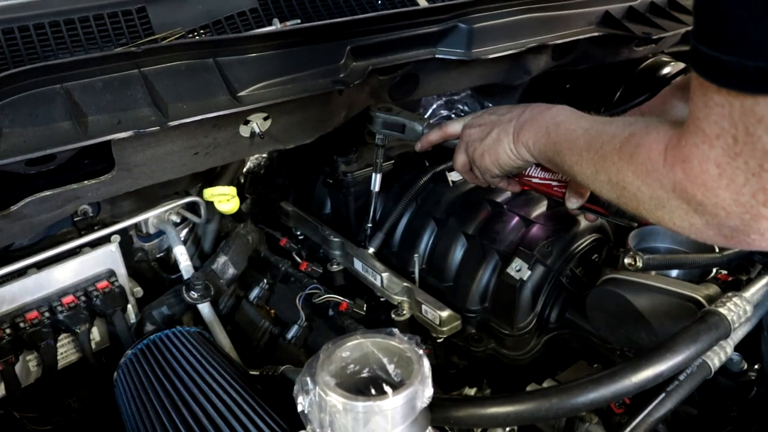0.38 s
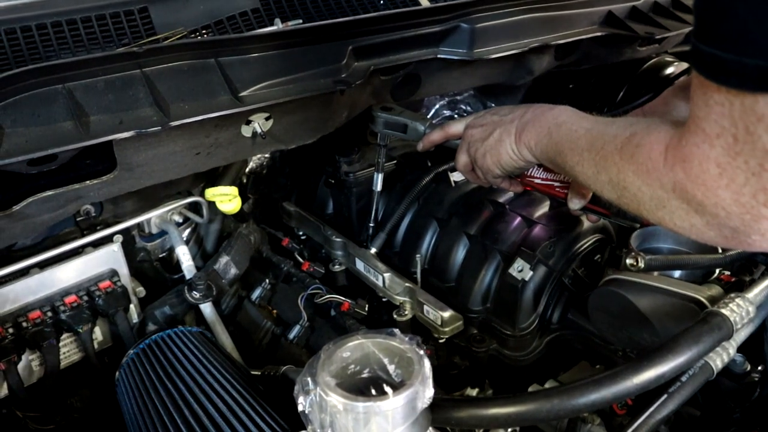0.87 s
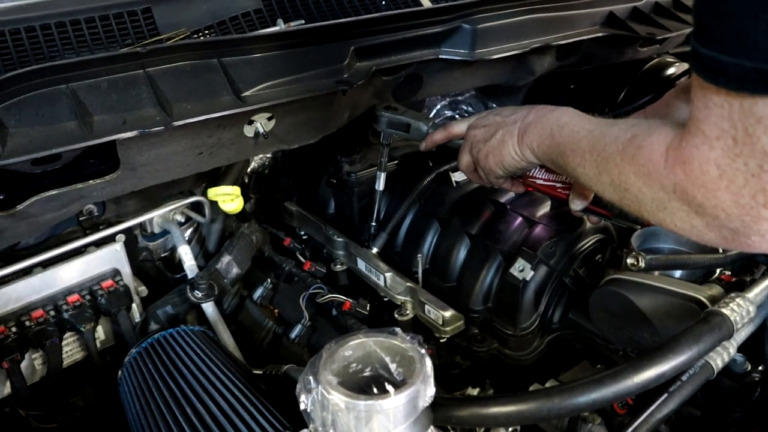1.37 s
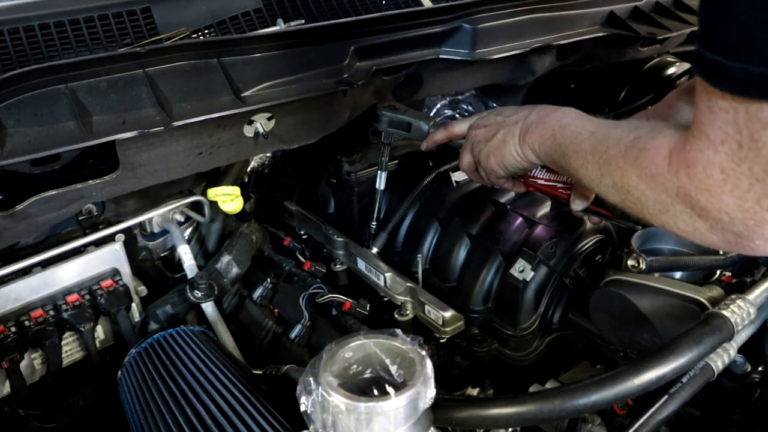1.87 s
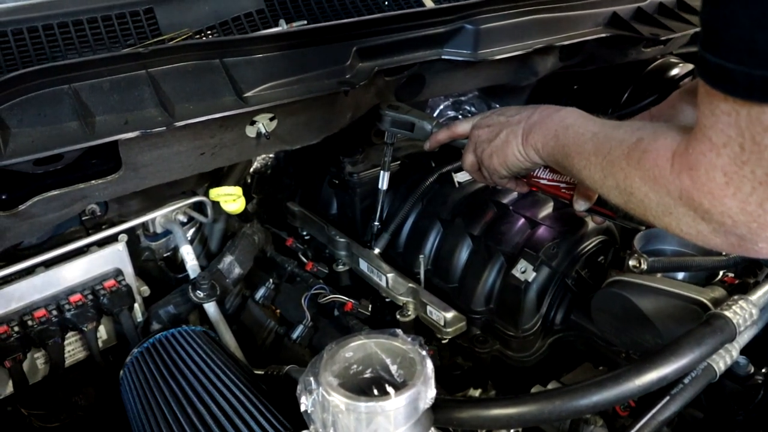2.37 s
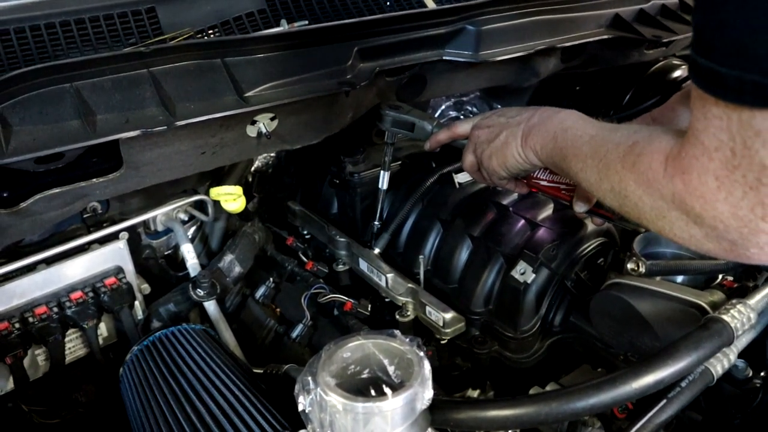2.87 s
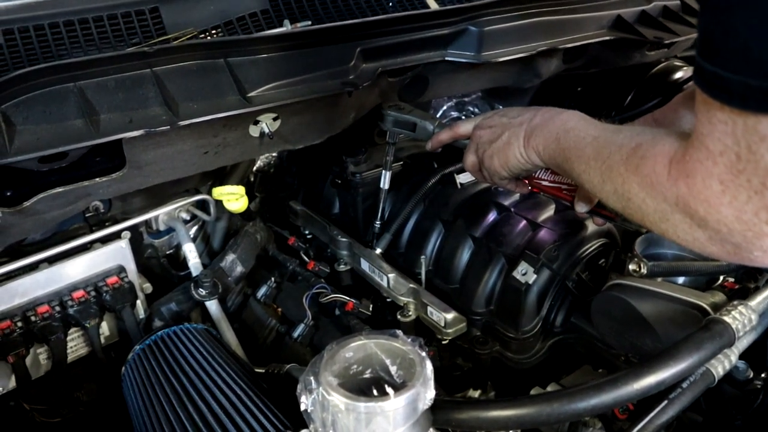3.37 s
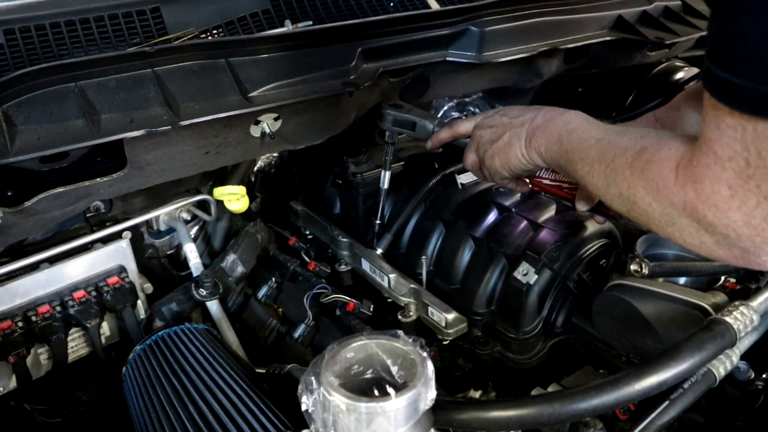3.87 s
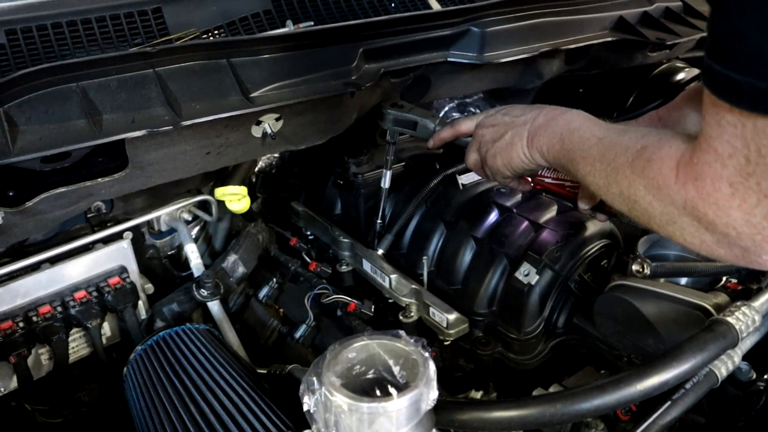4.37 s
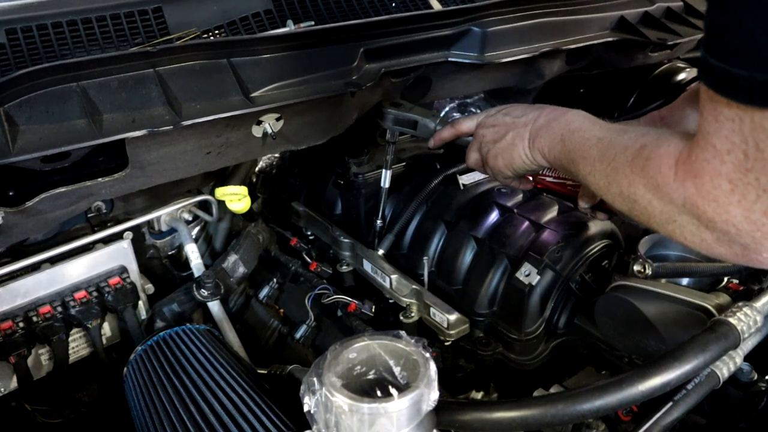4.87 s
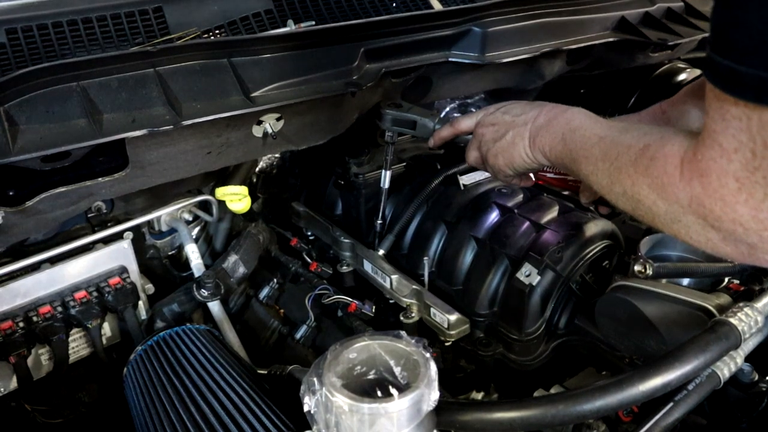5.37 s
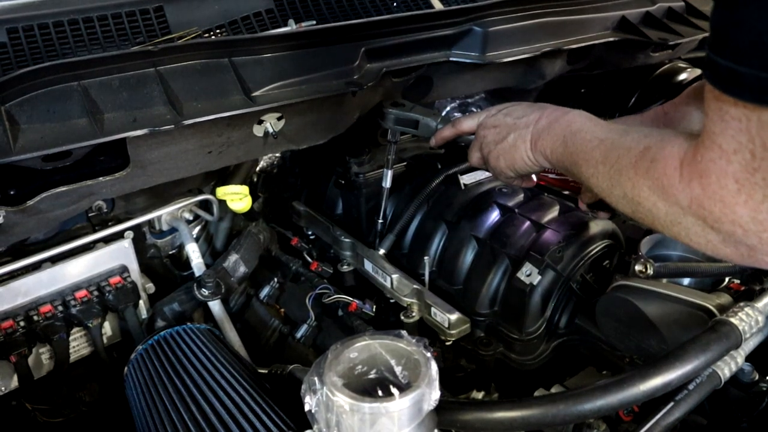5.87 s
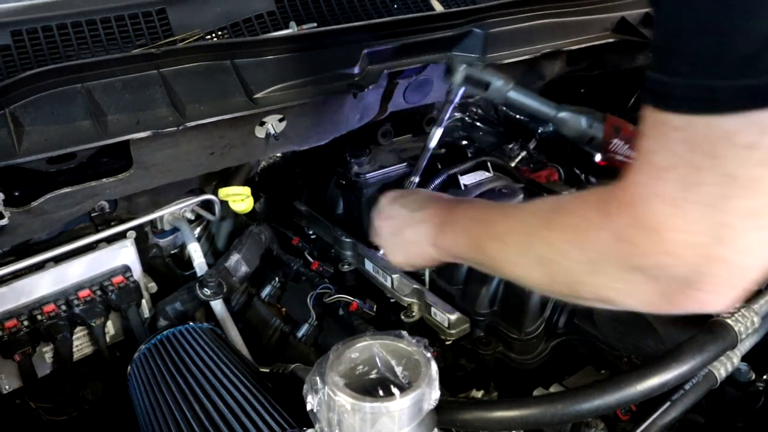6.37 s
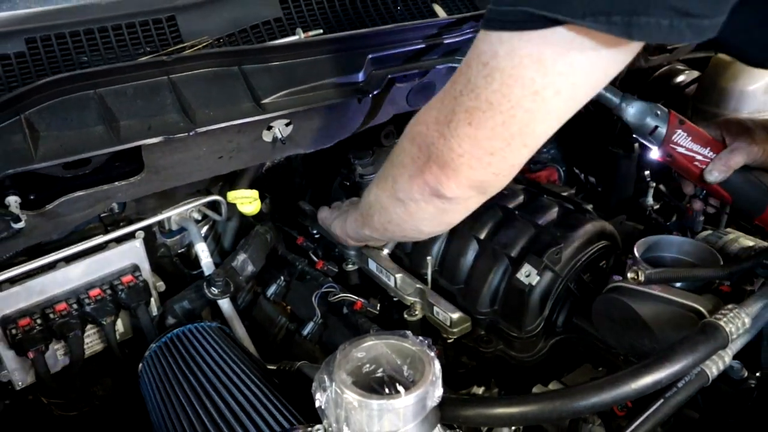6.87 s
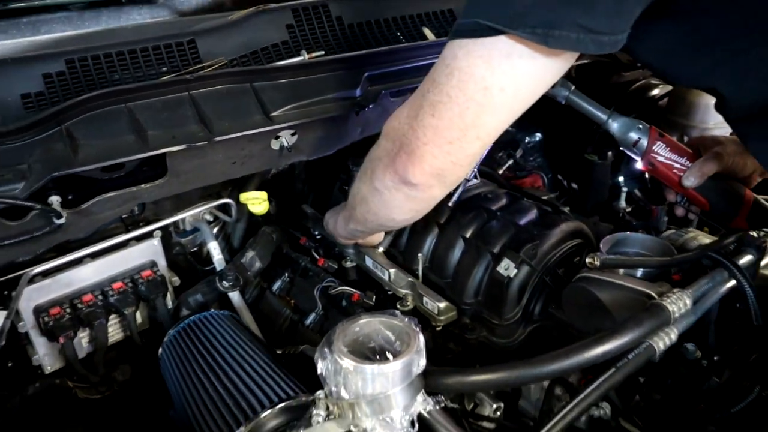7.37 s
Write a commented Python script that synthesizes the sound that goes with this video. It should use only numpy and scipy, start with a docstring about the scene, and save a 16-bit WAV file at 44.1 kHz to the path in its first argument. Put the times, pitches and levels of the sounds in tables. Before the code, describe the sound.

Close, buzzing power-ratchet rattle with a high motor whine runs six seconds, cuts off abruptly, then a few metallic knocks and quiet room hum.

```python
"""A cordless ratchet backs a bolt out in an engine bay, in widened stereo: motor and crank tones and a
whine are sines on one shaft; the pawl's clatter is noise bursts several times a crank turn over steady gear hiss.
The loose socket knocks: impulses and short noise in the modes of a plastic manifold. The trigger is let go, the
tool bumps free and clanks, ticks and thuds through steel and manifold modes. Behind it, shaped noise makes a
workshop's rumble and wash and a brushing sleeve, and a sine its throbbing hum; noise tails make the reflections."""
import sys
import numpy as np
from scipy import signal
from scipy.fft import rfft, irfft, next_fast_len
from scipy.io import wavfile
from scipy.ndimage import uniform_filter1d, map_coordinates

SR = 44100
rng = np.random.default_rng(int(sys.argv[2]) if len(sys.argv) > 2 else 0)


def log_audio(samples):
    """Write samples as a 16-bit WAV file to the path given in sys.argv[1]."""
    # one column per channel
    frames = np.atleast_2d(samples).T
    # limit to full scale, then quantise
    limited = np.clip(frames, -1, 1)
    pcm = np.round(limited * 32767).astype(np.int16)
    wavfile.write(sys.argv[1], SR, pcm)


def gain_from_decibels(decibels):
    """Convert decibel values to linear amplitude factors."""
    exponent = np.asarray(decibels, float) / 20
    return 10 ** exponent


N = 341334
T = np.arange(N) / SR
EASE_S, EASE_DB_PER_S = 5.97, -220  # the finger eases off the trigger
STOP_S, STOP_DB_PER_S, BRAKE_S = 6.008, -1100, 0.02  # trigger let go: clatter dies, tones fade


def unit(x):
    """Scaled to rms 1."""
    return x / np.sqrt(np.mean(x ** 2) + 1e-20)


def along(points, hz):
    """(Hz, value) points interpolated on a log frequency axis."""
    f, v = np.transpose(points)
    return np.interp(np.log(hz + 1), np.log(f + 1), v)


def curves(rows):
    """One value per sample for each column after the time."""
    s, *cols = np.transpose(rows)
    return [np.interp(T, s, c) for c in cols]


def wander(knots_hz):
    """A smooth random curve."""
    return map_coordinates(rng.standard_normal(int(N * knots_hz / SR) + 4), [T * knots_hz])


def bell(at_s, half_s):
    """A smooth bump of height 1, down to 1/e at half_s either side."""
    return np.exp(-((T - at_s) / half_s) ** 2)


def filtered(x, response):
    """x times a complex response of frequency."""
    m = next_fast_len(N + SR // 2)
    return irfft(rfft(x, m) * response(np.fft.rfftfreq(m, 1 / SR)), m)[..., :N]


def resonances(modes):
    """Causal response of (Hz, width Hz, dB) modes, alternating in sign."""
    def response(f):
        total = 0
        for k, (centre, width, db) in enumerate(modes):
            mode = 1j * f * width / (centre * centre - f * f + 1j * f * width)
            total = total + (-1) ** k * gain_from_decibels(db) * mode
        return total
    return response


def pushes(times_s, db):
    """A single-sample blow at each time."""
    return np.bincount(np.round(times_s * SR).astype(int), gain_from_decibels(db), N)


def bursts(times_s, db, t60_s):
    """A sudden noise at each time, dying exponentially."""
    out, t = np.zeros(N + SR), T[:SR // 8]
    for s, gain, life_s in np.broadcast(times_s, gain_from_decibels(db), t60_s):
        decay = gain_from_decibels(-60 * t / np.clip(life_s, 0.005, 0.12))
        out[round(s * SR):][:len(t)] += gain * decay * rng.standard_normal(len(t))
    return out[:N]


# Background likeness of the two sides. Each row: frequency in Hz, left-right correlation (-1 to 1).
LIKENESS = [(30, 0.96), (60, 1), (150, 1), (300, 0.97), (550, 0.82), (1650, -0.34), (4970, -0.67),
            (15000, -0.55)]


def rush(spectrum):
    """Stereo noise of a given slope; the mid/side balance sets how alike the sides are."""
    def response(hz):
        turn = np.arccos(np.clip(along(LIKENESS, hz), -1, 1)) / 2
        return gain_from_decibels(along(spectrum, hz)) * [np.cos(turn), np.sin(turn)]
    mid, side = filtered(rng.standard_normal((2, N)), response)
    return unit(np.array([mid + side, mid - side]))


# Slopes of the low rumble and the far wash. Each row: frequency in Hz, relative level in dB per Hz.
RUMBLE_SLOPE = [(15, -52), (28, -25), (45, -9.5), (87, 2.5), (120, -9.5), (133, 4.5), (168, -12), (221, -5),
                (340, -27.5), (400, -39.5), (520, -65), (880, -120)]
WASH_SLOPE = [(180, -30.5), (300, -11), (457, -12.5), (518, -5.5), (686, -10.5), (765, -9), (881, -11),
              (2280, -20.5), (3270, -28), (12500, -59.5), (16200, -97.5), (22000, -120)]
# The background swells once the tool is quiet. Each row: time in seconds, gain in dB.
BACKGROUND_SWELL = [(0, 1), (5.9, 0), (6.4, 4.5), (6.8, 4.5), (7.3, 9), (7.74, 10)]
# Throbs of the hum. Each row: time in seconds, level in dB over the hum, pitch in Hz.
HUM_THROBS = [(7.17, 18, 119), (7.59, 15.5, 122.3)]
RUMBLE_DB, WASH_DB, WASH_PER_RUMBLE_SWELL = -49.5, -54, 0.93
HUM_HZ, HUM_DB, THROB_HALF_S = 120.5, -54, 0.099


def shop():
    """Workshop: noise rumble and wash swell once the tool is quiet; a wavering sine hum throbs."""
    swell_db, = curves(BACKGROUND_SWELL)
    hum_hz = HUM_HZ + sum((hz - HUM_HZ) * bell(s, 2 * THROB_HALF_S) for s, _, hz in HUM_THROBS)
    hum_db = HUM_DB + sum(db * bell(s, THROB_HALF_S) for s, db, _ in HUM_THROBS)
    hum = np.sqrt(2) * gain_from_decibels(hum_db + 1.8 * wander(8)) * np.sin(2 * np.pi * np.cumsum(hum_hz) / SR)
    rumble = gain_from_decibels(RUMBLE_DB + swell_db + 0.6 * wander(2.52)) * rush(RUMBLE_SLOPE)
    wash = gain_from_decibels(WASH_DB + WASH_PER_RUMBLE_SWELL * swell_db + 0.7 * wander(4.4)) * rush(WASH_SLOPE)
    return rumble + wash + hum


# Slope of brushing cloth. Each row: frequency in Hz, relative level in dB per Hz.
CLOTH_SLOPE = [(2500, -29.5), (4500, -1.5), (8000, -9), (11000, -8.5), (13000, -14), (15000, -46.5)]
SLEEVE_S, SLEEVE_DB, REACH_DB_PER_S, SETTLE_DB_PER_S = 6.76, -63.5, 250, 11


def sleeve():
    """Cloth noise rises fast as the arm reaches in, then settles slowly."""
    shape_db = np.minimum(REACH_DB_PER_S * (T - SLEEVE_S), SETTLE_DB_PER_S * (SLEEVE_S - T))
    return gain_from_decibels(SLEEVE_DB + shape_db + 2.2 * wander(21)) * rush(CLOTH_SLOPE)


# Contacts as the tool comes free. Each row: time in seconds, relative clank level in dB,
# thud in dB relative to clank, tick in dB relative to clank, left over right in dB for clank and tick.
CONTACTS = [(6.2235, -22, 5.5, -0.5, 1), (6.232, -28, 6, 0, 2), (6.242, -33, 12, -3, 1.5),
            (6.251, -41.5, 17, -12, -5.5), (6.2711, -51.5, 24, -8.5, -3), (6.2933, -52, 18.5, -10, -0.5),
            (6.3098, -49.5, 13, 6, -2.5), (6.358, -40, 2, 2.5, -3.5), (6.359, -31.5, -10, 10.5, -3.5),
            (6.4, -43, -11, -24, -1.5), (6.473, -53, -4.5, -18, -3), (6.505, -47, 5, -6, -0.5),
            (6.512, -51, 6.5, 2, -0.5), (6.546, -48.5, -2, 10.5, 1), (6.5515, -50.5, -5, 10.5, -1),
            (7.452, -48, 3, 0, -3.5)]
# Modes of extension bar, socket rim and plastic manifold. Each row: frequency in Hz, width in Hz, level in dB.
BAR_MODES = [(1380, 840, -0.5), (2190, 770, 5), (3440, 1600, 0)]
RIM_MODES = [(4900, 440, -7), (5950, 660, 0), (7570, 1200, -4), (10600, 2400, -3)]
MANIFOLD_MODES = [(109, 50, -1.5), (181.3, 62, 4), (253, 72, 2.5), (337, 58, 2.5), (454, 50, -0.5),
                  (650, 120, -9), (920, 180, -8.5), (1444, 190, -7.5)]
CLANK_T60_S, TICK_T60_S, THUD_T60_S = 0.058, 0.023, 0.082
BAR_TOP_HZ, DULL_HZ, SOFT_HZ = 5500, 10030, 1100  # rolloffs: bar, all steel contacts, soft thud


def bumps():
    """Each contact rattles the modes of bar and socket, and thuds in the manifold."""
    s, db, thud_db, tick_db, pan_db = np.transpose(CONTACTS)

    def pair(level_db, t60_s):
        return np.array([bursts(s, level_db + side * pan_db / 2, t60_s) for side in (1, -1)])

    clank = filtered(pair(db + 7.5, CLANK_T60_S),
                     lambda hz: resonances(BAR_MODES)(hz) / (1 + 1j * hz / BAR_TOP_HZ) ** 2)
    tick = filtered(pair(db + tick_db + 3.5, TICK_T60_S), resonances(RIM_MODES))
    steel = filtered(clank + tick, lambda hz: 1 / (1 + 1j * hz / DULL_HZ * 1.12 - (hz / DULL_HZ) ** 2) ** 2)
    blows = pushes(s, db + thud_db + 36.0) + bursts(s, db + thud_db + 14.5, THUD_T60_S)
    thud = filtered(blows, lambda hz: resonances(MANIFOLD_MODES)(hz) / (1 + 1j * hz / SOFT_HZ) ** 2)
    return steel + thud


# Knocks of the loose socket. Each row: time in seconds, relative level in dB.
KNOCKS = [(0.118, -40.5), (0.174, -34), (0.456, -31.5), (0.498, -32), (0.54, -35.5), (0.603, -33),
          (1.097, -36.5), (1.154, -33), (1.223, -39), (1.295, -34.5), (1.521, -41), (1.879, -40),
          (2.328, -32.5), (2.788, -33.5), (3.006, -33.5), (3.033, -33.5), (3.123, -36.5), (3.502, -39),
          (3.786, -36), (4.018, -39), (4.315, -37), (4.518, -36), (4.549, -33), (4.68, -33), (4.813, -27.5),
          (4.905, -35.5), (5.141, -32.5), (5.229, -46.5), (5.273, -45.5), (5.581, -36.5), (5.647, -31.5),
          (5.717, -33), (5.875, -32.5)]


def wobble():
    """Socket knocks, and faint random ones while the tool runs, excite the manifold modes."""
    s, db = np.transpose(KNOCKS)
    faint = rng.random((80, 2))
    blows = pushes(s, db + 34.5) + bursts(s, db + 13.0, t60_s=0.035)
    blows += bursts(STOP_S * faint[:, 0], -28 - 8 * faint[:, 1], t60_s=0.012)
    return filtered(blows, resonances(MANIFOLD_MODES))


# Play of the bolt in its thread. Each row: time in seconds, looseness (share 0-1).
THREAD_PLAY = [(0, 0.11), (2.2, 0.11), (4.1, 0.17), (4.6, 0.98), (5, 0.7), (6, 0.7)]


def looseness():
    """Play of the bolt in its thread over time."""
    return curves(THREAD_PLAY)[0]


# Motor shaft speed. Each row: time in seconds, turns in Hz.
SHAFT_SPEED = [(0.05, 500.0), (0.35, 500.25), (0.65, 504.75), (0.82, 502.5), (1.2, 504.5), (1.4, 502.25),
               (1.55, 504), (1.85, 505.75), (2.05, 502.75), (2.18, 505.75), (2.38, 503), (2.5, 504.5),
               (2.6, 503.25), (2.75, 504.25), (2.95, 503.0), (3.05, 506), (3.2, 505), (3.25, 501),
               (3.38, 500.5), (3.48, 506.5), (3.55, 507.5), (3.65, 503.5), (3.85, 507.5), (3.95, 505.5),
               (4.08, 510), (4.3, 508.5), (4.45, 510), (4.6, 509), (4.84, 510), (4.93, 495), (5.05, 500),
               (5.2, 507), (5.95, 507.25)]
HUNT_HZ, HUNT_LOOSE_HZ = 0.15, 0.45  # random speed scatter; more of it when loose


def shaft_turns():
    """Motor turns so far: the speed summed; it hunts more as the bolt loosens."""
    hunt_hz = (HUNT_HZ + HUNT_LOOSE_HZ * looseness()) * wander(9)
    return np.cumsum(curves(SHAFT_SPEED)[0] + hunt_hz) / SR


SLIP_CLATTER_DB, SLIP_TONE_DB = -1.3, -11


def slip():
    """The socket rides up off the bolt for a moment."""
    return bell(4.95, 0.07)


def easing_db():
    """Level lost as the finger eases off the trigger."""
    return EASE_DB_PER_S * np.maximum(T - EASE_S, 0)


def tone(turns, db, flutter_db, drift_rad):
    """A sine locked to the shaft, its level and phase wandering."""
    level = np.sqrt(2) * gain_from_decibels(db + flutter_db * wander(14))
    return level * np.sin(2 * np.pi * turns + drift_rad * wander(20))


# Tones of motor and crank. Each row: multiple of that part's turn, level in dB rms before wander (crank: at 0 s).
MOTOR_TONES = [(1, -45), (4, -44)]
CRANK_TONES = [(3, -61.5), (5, -61), (6, -69.5), (8, -57), (9, -56.5), (10, -49.5), (11, -54), (15, -62)]
MOTOR_DRIFT_RAD, CRANK_DRIFT_RAD = 0.22, 0.7
STRAIN_DB_PER_S = -0.78  # crank tones weaken as the load comes off
WHINE_DB, WHINE_SWELL_DB, SWELL_S, SWELL_HALF_S = -33, 3.5, 4.25, 0.32  # swells as the last threads run
FREE_S, FREE_FADE_S, FREE_DB = 4.67, 0.4, -6  # fades once the bolt spins free


def motor_and_crank(shaft, crank):
    """Sines at multiples of motor and crank turns, plus a whine from eight commutator bars a turn."""
    total = 0
    for multiple, db in MOTOR_TONES:
        total = total + tone(multiple * shaft, db + 1.5 * wander(35), 2.0, MOTOR_DRIFT_RAD)
    for multiple, db in CRANK_TONES:
        total = total + tone(multiple * crank, db + STRAIN_DB_PER_S * T, 3.5, CRANK_DRIFT_RAD)
    whine_db = WHINE_DB + WHINE_SWELL_DB * bell(SWELL_S, SWELL_HALF_S)
    whine_db += FREE_DB * np.clip((T - FREE_S) / FREE_FADE_S, 0, 1)
    whine = tone(8 * shaft, whine_db, 1.5, MOTOR_DRIFT_RAD)
    braking = np.clip(1 - (T - STOP_S) / BRAKE_S, 0, 1) ** 2
    return (total + whine) * braking * gain_from_decibels(SLIP_TONE_DB * slip() + easing_db())


REPEAT_SHARE, REPEAT_TURNS = 0.13, 6  # share of clatter noise power alike from turn to turn; for how long


def teeth(crank):
    """Noise that recurs each crank turn, since the same teeth meet; the pattern slowly changes."""
    pattern = rng.standard_normal((3, int(crank[-1] / REPEAT_TURNS) + 2, round(N / crank[-1])))
    row = (crank / REPEAT_TURNS).astype(int)
    spot = (crank % 1 * pattern.shape[2]).astype(int)
    fade = crank / REPEAT_TURNS % 1 * np.pi / 2
    return np.cos(fade) * pattern[:, row, spot] + np.sin(fade) * pattern[:, row + 1, spot]


# Pawl contacts of one crank turn. Each row: share of turn, relative housing level in dB, relative head level in dB.
PAWL_CONTACTS = [(.26, -4.5, 10), (.4, -8, -10.5), (0.601, -1, 10.5), (0.899, -13.5, -18.5)]
# The thread grips or lets go: the driving contact lands harder or softer.
# Each row: time in seconds, grip in dB before each part's share, half length in seconds.
THREAD_GRIPS = [(.55, 7.5, 0.059), (1.105, 6.5, 0.11), (1.406, -3, .04), (1.52, 1, .04), (2.002, -6.5, .04),
                (2.356, 2.5, 0.091), (2.88, 2, 0.077), (3.2, -8, .03), (3.304, 5.5, 0.034),
                (3.65, 2, 0.041), (4.0, 4.5, .05), (4.24, 3, .03), (4.6, 8, 0.065), (4.82, 5, 0.025),
                (5.16, 5, .05), (5.473, 2.5, 0.054), (5.752, 1.5, .06)]
RETURN_SHARE = -0.43  # return contacts do the opposite of the driving ones
SLACK_TIGHT_TURNS, SLACK_LOOSE_TURNS = 0.013, 0.07  # timing scatter


def clatter(crank, sizes_db, grip_share, t60_s, scatter_db, hiss, snap, rise_s):
    """Pawl contacts as noise bursts over steady gear hiss.
    Three rows, one rhythm: the straight path and the bounced paths to left and right."""
    turns = np.arange(int(crank[-1]))[:, None] + np.transpose(PAWL_CONTACTS)[0]
    loose = np.interp(turns, crank, looseness())
    slack = SLACK_TIGHT_TURNS + (SLACK_LOOSE_TURNS - SLACK_TIGHT_TURNS) * loose
    times_s = np.interp(turns + slack * rng.standard_normal(turns.shape), crank, T)
    at = (times_s * SR).astype(int).ravel()
    grip_db = sum(db * bell(s, half_s) for s, db, half_s in THREAD_GRIPS)
    grip_db = grip_share * np.interp(turns, crank, grip_db) * np.where(turns % 1 < 0.5, 1, RETURN_SHARE)
    size = gain_from_decibels(sizes_db + grip_db + scatter_db * rng.standard_normal(turns.shape)).ravel()
    hits = np.bincount(at, size, N)[:N]

    def dying(life_s):
        return unit(signal.lfilter([1], [1, -gain_from_decibels(-60 / (life_s * SR))], hits))

    rise = round(rise_s * SR)
    swelling = uniform_filter1d(dying(t60_s), rise, origin=rise // 2 - 1)
    burst = swelling + snap * dying(0.004)  # a sharp tick heads each burst
    grit = np.sqrt(1 - REPEAT_SHARE) * rng.standard_normal((3, N)) + np.sqrt(REPEAT_SHARE) * teeth(crank)
    return (unit(burst) + hiss) * grit


def mottled(x, depth_db=2):
    """Random patches of gain some 700 Hz wide and 6 ms long, shared by all paths."""
    z = signal.stft(x, nperseg=256, noverlap=192)[2]
    field = uniform_filter1d(rng.standard_normal(z.shape[1:]), size=4, axis=0)
    field = uniform_filter1d(field, size=4, axis=1)
    return unit(signal.istft(z * gain_from_decibels(depth_db * unit(field)), nperseg=256, noverlap=192)[1][:, :N])


# Slope of the housing. Each row: frequency in Hz, relative level in dB per Hz.
HOUSING_SLOPE = [(150, -46), (300, -38), (450, -20), (560, -13), (740, -11), (950, -17.5), (1200, -14.5),
                 (1400, -9), (1800, -10.5), (2700, -4), (3100, -4.5), (3900, -0.5), (4800, -5.5),
                 (6300, -4.5), (8500, -10.5), (11000, -18.5), (14400, -54.5), (15000, -89.5)]
# Modes of the housing. Each row: frequency in Hz, width in Hz, level in dB over the slope.
HOUSING_MODES = [(1907, 140, 3.5), (2400, 90, 2), (2800, 160, 4.5), (3240, 100, 2.5), (3430, 110, 2),
                 (4310, 50, 2.5), (5150, 130, 1.5), (5520, 84, 0), (6620, 420, 1.5)]
GROWL_HZ, GROWL_DB_PER_S = 2330, -0.3  # the lower part weakens as the load comes off


def housing_clatter(crank):
    """Pawl bursts coloured by the housing's slope and modes."""
    def response(hz):
        modes_db = sum(db / (1 + (2 * (hz - c) / w) ** 2) for c, w, db in HOUSING_MODES)
        return gain_from_decibels(along(HOUSING_SLOPE, hz) + modes_db)

    raw = clatter(crank, np.transpose(PAWL_CONTACTS)[1], grip_share=0.37, t60_s=0.034,
                  scatter_db=2.0, hiss=0.98, snap=0.22, rise_s=0.0008)
    body = mottled(filtered(raw, response))
    growl = filtered(body, lambda hz: 1 / (1 + (hz / GROWL_HZ) ** 4))
    return body + (gain_from_decibels(GROWL_DB_PER_S * (T - STOP_S / 2)) - 1) * growl


# Slope of the steel head when tight. Each row: frequency in Hz, relative level in dB per Hz.
HEAD_SLOPE = [(4400, -26.5), (7500, -14), (8700, -12), (9900, -3), (10300, -1.5), (10650, 3.5),
              (11050, -1.5), (12000, -8.5), (14000, -20), (14500, -30.5), (14800, -55.5), (15600, -71)]
# The head rings lower when fully loose. Each row: frequency in Hz, change in dB.
LOOSE_HEAD = [(9000, 2.5), (9900, 2.5), (10400, 0.5), (10700, -3), (12000, -0.5)]


def head_clatter(crank):
    """Pawl bursts in the steel head, mixed between its tight and loose colours."""
    raw = clatter(crank, np.transpose(PAWL_CONTACTS)[2], grip_share=0.99, t60_s=0.017,
                  scatter_db=2.0, hiss=0.69, snap=0.1, rise_s=0.0014)
    loose = np.clip(looseness() + 0.35 * wander(40), 0, 1)
    tight_sound = unit(filtered(raw, lambda hz: gain_from_decibels(along(HEAD_SLOPE, hz))))
    loose_sound = unit(filtered(raw, lambda hz: gain_from_decibels(along(HEAD_SLOPE, hz) + along(LOOSE_HEAD, hz))))
    return mottled((1 - loose) * tight_sound + loose * loose_sound)


MOTOR_TURNS_PER_CRANK_TURN = 7.125
CLATTER_DB, SIZZLE_DB, SIZZLE_LOOSE_DB = -21, -2.5, 2  # housing; head over it; head's gain at looseness 1


def ratchet():
    """Motor tones, crank tones and clatter all hang on one shaft."""
    shaft = shaft_turns()
    crank = shaft / MOTOR_TURNS_PER_CRANK_TURN
    load_db = CLATTER_DB + SLIP_CLATTER_DB * slip() + 0.098 * wander(10)
    load_db += STOP_DB_PER_S * np.maximum(T - STOP_S, 0) + easing_db()
    sizzle_db = SIZZLE_DB + SIZZLE_LOOSE_DB * looseness() + 0.9 * wander(11)
    noise = gain_from_decibels(load_db) * housing_clatter(crank) + gain_from_decibels(load_db + sizzle_db) * head_clatter(crank)
    return noise, motor_and_crank(shaft, crank)


SIDES = np.array([[1], [-1]])  # left, right
# Left behind right on the straight path. Each row: frequency in Hz, phase in radians.
PORT_LAG = [(600, .1), (1500, .4), (2500, 1.8), (5000, 1.76), (12000, 1.1)]
# Clatter reaching each port by its own bounces. Each row: frequency in Hz, share of power (0-1).
BOUNCE_SHARE = [(150, .1), (600, 0.37), (1500, 0.55), (4000, 0.67), (12000, 0.45)]
# Balance of the tool. Each row: frequency in Hz, left over right in dB.
TOOL_BALANCE = [(60, -0.5), (180, -5.5), (550, -1), (1650, -4), (4970, -2.5), (15000, 0)]


def at_ports(noise, tonal):
    """The tool sits off centre: straight sound lags at the left, bounced clatter differs per side."""
    def lag(hz):
        return np.exp(-1j * SIDES * along(PORT_LAG, hz) / 2)

    def share(hz):
        return np.clip(along(BOUNCE_SHARE, hz), 0, 1)

    straight = filtered(noise[0], lambda hz: lag(hz) * np.sqrt(1 - share(hz))) + filtered(tonal, lag)
    bounced = filtered(noise[1:], lambda hz: np.sqrt(share(hz)))
    return filtered(straight + bounced, lambda hz: gain_from_decibels(SIDES * along(TOOL_BALANCE, hz) / 2))


def space(x, t60s, delay_s):
    """Reflections as noise tails, unlike on the two sides, each frequency dying at its own speed."""
    hz, t, z = signal.stft(rng.standard_normal((2, SR // 2)), SR, nperseg=128)
    tail = signal.istft(z * gain_from_decibels(-60 * t / along(t60s, hz)[:, None]), SR, nperseg=128)[1]
    tail /= np.linalg.norm(tail, axis=1, keepdims=True)
    delayed = np.pad(x, (round(delay_s * SR), 0))
    return signal.fftconvolve(delayed[None], tail, axes=1)[:, :N]


# Decay of close metal and of the workshop. Each row: frequency in Hz, t60 in seconds.
BAY_DECAY = [(300, 0.037), (3000, 0.053), (12000, 0.023)]
HALL_DECAY = [(300, 0.66), (3000, 0.71), (12000, 0.35)]


def reflections(tool, hit):
    """Bumps echo off close metal; tool and bumps echo in the workshop."""
    hall = gain_from_decibels(-25) * space(tool, HALL_DECAY, delay_s=0.012)
    hall += gain_from_decibels(-20.5) * space(hit, HALL_DECAY, delay_s=0.01)
    return gain_from_decibels(-15.5) * space(hit, BAY_DECAY, delay_s=0.001577) + hall


# The recorder's widening. Each row: frequency in Hz, gain on left minus right in dB.
SIDE_GAIN = [(60, -24.5), (150, -1), (300, 7), (600, -0.5), (2500, -0.5), (9000, 3), (13000, 6)]


def widened(near):
    """The recorder widens the sides, by frequency."""
    wide = filtered(near[0] - near[1], lambda hz: gain_from_decibels(along(SIDE_GAIN, hz))) / 2
    return near.mean(0) + SIDES * wide


def scene():
    """Tool, bumps and their reflections, widened, plus workshop and sleeve."""
    noise, tones = ratchet()
    hits = bumps()
    near = at_ports(noise, tones + wobble()) + hits + reflections(noise[0] + tones, hits.mean(0))
    return widened(near) + shop() + sleeve()


def roll_off(x):
    """The treble ends steeply here."""
    return signal.sosfilt(signal.butter(12, 15710, fs=SR, output="sos"), x)


HISS_DB, CEILING = -75, 0.95


def record(dry):
    """Microphones add faint hiss, duller at the top; the input stage rounds off the highest peaks."""
    hiss = unit(signal.lfilter([1, 2, 1], [1], rng.standard_normal((2, N))))
    wet = dry + gain_from_decibels(HISS_DB) * hiss
    soft = wet / (1 + np.abs(wet / CEILING) ** 8) ** 0.125
    return roll_off(soft)


dry = scene()
out = record(dry)
log_audio(out)
```